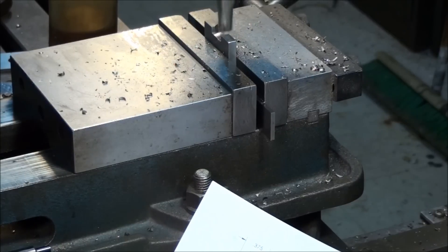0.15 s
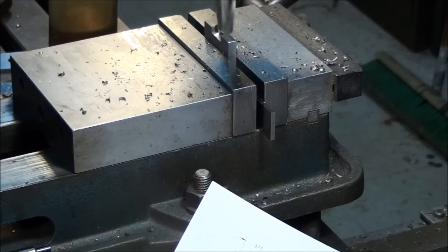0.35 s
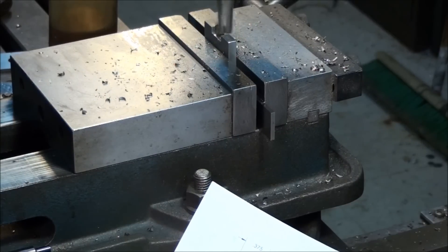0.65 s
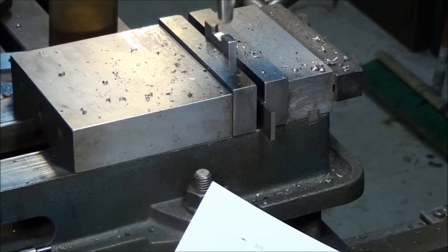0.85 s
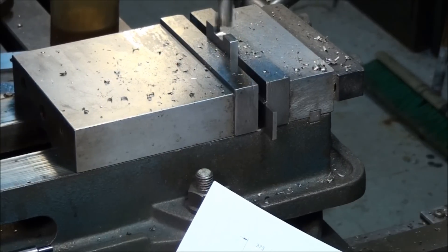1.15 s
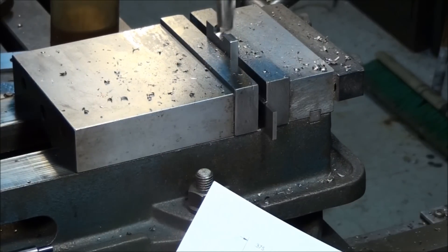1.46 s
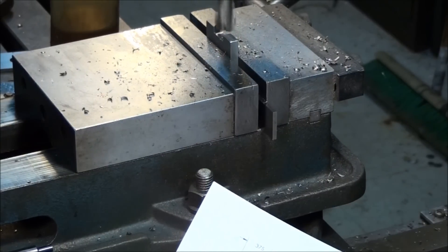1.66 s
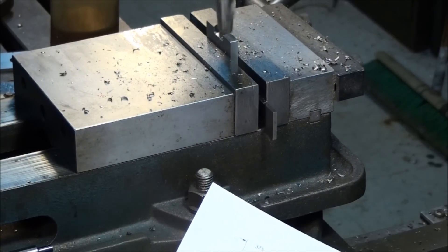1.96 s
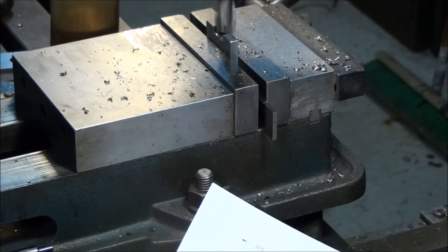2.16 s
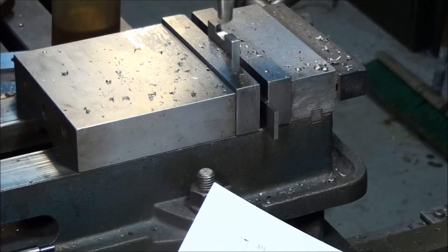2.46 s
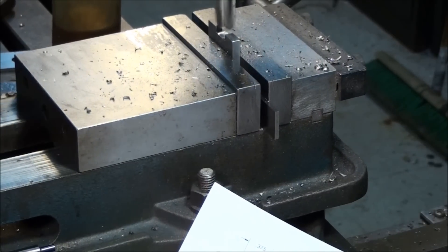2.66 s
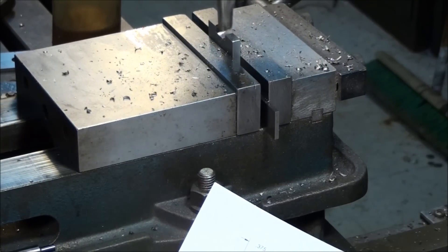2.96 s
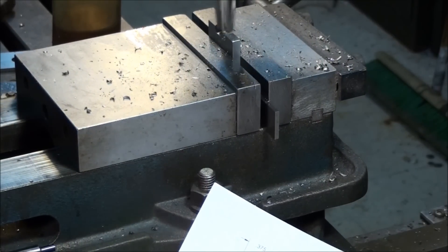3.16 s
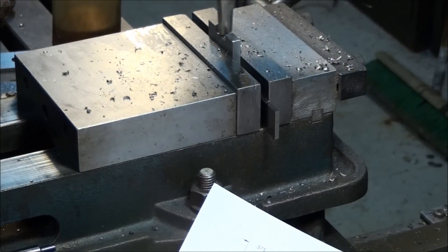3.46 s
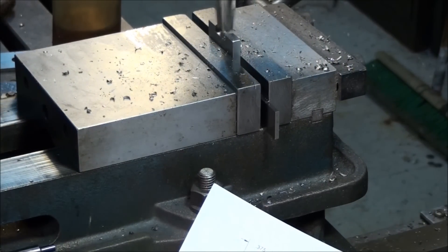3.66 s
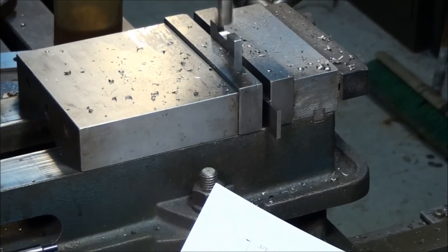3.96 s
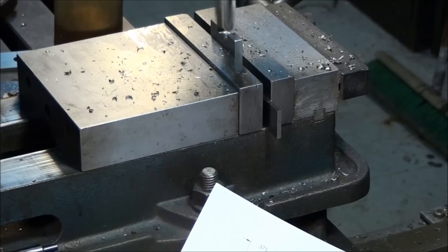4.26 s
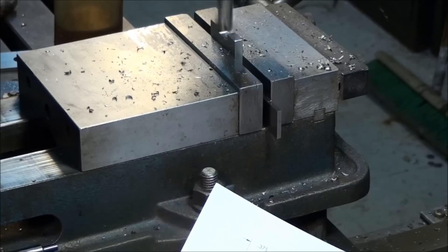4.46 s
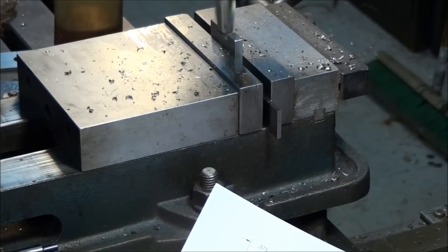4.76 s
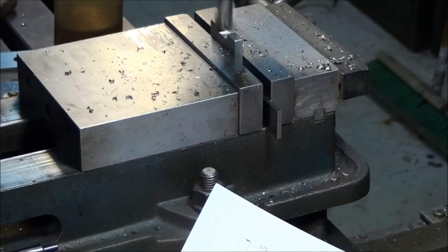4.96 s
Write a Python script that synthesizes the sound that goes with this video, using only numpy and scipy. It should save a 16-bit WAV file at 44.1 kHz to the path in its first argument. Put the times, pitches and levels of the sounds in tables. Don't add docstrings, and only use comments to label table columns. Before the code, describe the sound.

A spindle motor hums and whines continuously with a rough bearing rush. Over it come four bursts of fast, regular metallic chatter, each bite a sharp bright crunch with ringing metal and a dull low knock from the vise and table. Bites vary unevenly, and one faint scrape comes between the second and third bursts. Close microphone, narrow stereo, short hard-room reverberation.

```python
import sys
import numpy as np
from scipy import signal
from scipy.fft import rfft, irfft, next_fast_len
from scipy.io import wavfile
from scipy.ndimage import uniform_filter1d, map_coordinates

SR = 44100
rng = np.random.default_rng(int(sys.argv[2]) if len(sys.argv) > 2 else 0)


def wav_record(signal):
    frames = np.transpose(np.atleast_2d(signal))
    bounded = np.clip(frames, -1, 1)
    quanta = np.round(bounded * 32767).astype(np.int16)
    wavfile.write(sys.argv[1], SR, quanta)


def boost(x):
    u = np.asarray(x, float) / 20
    return 10 ** u


N = 224670
TURN_S = .03558

# first bite t/s, last bite t/s
PASSES = [
    (0.0148, 0.8),
    (1.2934, 2.265),
    (2.542, 2.64),
    (2.7505, 3.711),
    (4.1045, 4.945),
]
# t/s, level/dB
DEPTH_OF_CUT = [
    [(0, -1), (.2, 1.5), (.35, -0.5), (.52, -4), (.62, -5.5), (.76, -8.5), (.8, -14.5)],
    [(1.29, -1), (1.4, 0.9), (1.7, 0.8), (2.12, 0.15), (2.18, -6), (2.255, -7.5), (2.29, -10.5)],
    [(2.54, -23), (2.61, -15.5), (2.65, -19)],
    [(2.75, -2), (2.9, 0.2), (3.2, 0.15), (3.45, -0.5), (3.5, -5.5), (3.68, -8.5), (3.71, -15.5)],
    [(4.1, 0.5), (4.25, -2), (4.45, -1.2), (4.65, 2), (4.75, -4), (4.9, -4), (4.965, -7.5), (4.995, -11),
     (5.03, -21)],
]
# t/s, catch level/dB, shank level/dB
SKIMS = [(.121, -8.5, -1), (.193, -14.5, -2), (.263, -15, 1), (.405, -14, -3), (.549, -11, 7),
         (.692, -4, 1), (1.4, -4, -6), (1.436, -5, 4), (1.507, -10.5, 10), (1.613, -6.5, -5),
         (1.756, -4.5, -9), (1.898, -11, 1), (2.04, -1.5, -3), (2.076, -3.5, 4), (2.82, -13, 5),
         (2.893, -3.5, 1), (2.929, -5.5, 10), (3.107, -3, 2), (3.249, -13, 1), (3.284, -7.5, 10),
         (3.356, -4.5, 2), (3.463, -5, -2), (4.104, -10, -1), (4.14, -8, 3), (4.246, -7.5, 0),
         (4.282, -13, 15), (4.46, -2.5, 1), (4.782, -1, 5), (4.817, -8, 5), (4.924, -14, 12)]
# t/s, catch level/dB, shank level/dB, wall level/dB
HARD_BITES = [(.086, 1, 5, 3), (.228, 0, 4.5, 1), (.335, 3.5, -13, 3), (.37, 1.5, 6, 1),
              (.478, -2.5, 3, 5.5), (.514, 5, -4, 3), (.585, 4.5, -1, -8), (.622, 7.5, -2, 1.5),
              (.656, 1, 5, 4), (1.364, 2.5, 3, -1), (1.543, -0.5, -1, 4), (1.649, -2.5, 8, 2),
              (1.72, 0, 6, -1.5), (1.791, 1.5, 5, 3), (1.827, 1, -9, 3), (1.97, 2.5, -8, 1),
              (2.004, 1.5, -1, -5), (2.148, -1, 7, 7), (2.858, 3.5, 5, 2.5), (3.0, 4, 4, -1),
              (3.071, 2, 3, -2), (3.178, 4, -5, 3.5), (3.214, 2, 5.5, -6), (3.32, 4.5, -5, -3),
              (3.57, 2, 8, 0), (4.354, 1.5, 5, 0), (4.567, -3, 7, 6.5), (4.674, -1.5, -4, 3.5),
              (4.747, 10, -11, -9), (4.852, 0.5, 5, 2.5)]

# f/Hz, width/Hz, level/dB
CUTTER_MODES = [(8666, 120, 0.5), (8762, 104, 2), (7980, 130, -14)]
SHANK_MODES = [(12300, 190, 7), (12450, 400, 2), (13300, 200, -15), (15300, 260, -20), (10980, 110, -16)]
WALL_MODES = [(4040, 50, -5), (4150, 80, -6), (4500, 70, 4), (4420, 110, -3), (5650, 88, -17),
              (2533, 160, -8.5), (3068, 94, -10.5)]
WALL_ROOT_MODES = [(3405, 120, -8), (3618, 96, 0.5), (4050, 97, 3), (4164, 47, -1.5)]
TABLE_MODES = [(525.6, 40, -2.5), (1327, 254, -1.5), (2116, 99, -10), (2308, 34, -12), (2525, 22, -16)]
BED_MODES = [(210, 21, -3.5), (296, 52, -3), (364, 20, 3), (419, 12.6, 8), (536, 22, 2.5), (647, 34, 7.5),
             (762, 18, 4.5)]

# f/Hz, density level/dB
SHEAR_SPECTRUM = [(880, -1), (1500, -43), (1710, -8.5), (3310, -4), (4330, 2.5), (5940, -9), (6430, -3.5),
                  (8240, -5), (8920, -17), (9280, -8), (10200, -17), (12600, -16), (16000, -52)]
CLATTER_SPECTRUM = [(35, -48), (60, -38), (150, 3), (195, -12), (414, -6.5), (837, -4), (1320, 1),
                    (1690, -7), (3000, -11.5), (3900, -19), (6600, -120)]
BEARING_SPECTRUM = [(15, -59), (50, -30), (90, -49), (125, -6.5), (190, -8), (300, -10), (450, -4.5),
                    (700, -7), (1100, -7.5), (1420, -5), (1700, -18), (4400, -21.5), (4900, -26),
                    (8500, -29.5), (16000, -48.5)]

SING_HZ = (5036, 6545)
# t/s, level/dB
LOW_SWELLS = [(.052, -37), (.23, -37), (.302, -38), (.444, -34.5), (.55, -39), (.66, -39.5), (.765, -37.5),
              (1.33, -40), (1.544, -38), (1.83, -37), (2.08, -42), (2.15, -34.5), (2.255, -45), (3.18, -41),
              (3.322, -37.5), (3.464, -32), (4.178, -38), (4.355, -36.5), (4.57, -36), (4.746, -33),
              (4.89, -35)]
HIGH_SWELLS = [(.03, -37.5), (.25, -41), (.63, -36), (1.35, -40), (1.59, -36), (1.84, -33), (2.08, -34),
               (2.27, -36), (3.18, -34), (3.43, -38), (4.22, -34), (4.49, -36), (4.69, -40), (4.85, -39)]

SHAKE_HZ = (55.6, 82.6, 140.8, 168.9)
SHAKE_DB = [(7.7, 11, 8.6, -19), (17, 16, 4.2, -0.5), (1, -1, 7, -12), (17.46, 13, 12.3, 6),
            (9.9, 12, 11.8, 4)]

# f/Hz, rms level/dB, wander/Hz
MOTOR_TONES = [(49, -46.5, .5), (118.8, -34, 0.63), (178, -42, 1.7), (435.7, -40, 4.27), (485, -41, 1.74),
               (685, -39, 2.84), (905, -45, 3.13), (969, -39.5, 6.27), (1134, -41.5, 6.66),
               (1294, -39, 0.93), (1295, -43.5, 1.06), (1400, -28.5, 0.89), (1411, -36.5, 2),
               (1468, -39.5, 2.7), (1540, -45, 1.8), (1640, -48, 1.2)]
# t/s, level/dB
BEARING_DB = [(0, -19.5), (.9, -27.5), (1.2, -24.5), (2.35, -26), (2.6, -23.5), (2.75, -25.5), (3.8, -25),
              (4.05, -27.5), (5.09, -24)]

# f/Hz, t60/s
SHOP_T60 = [(150, 0.57), (1500, 0.49), (6000, 0.22), (14000, 0.09)]
# f/Hz, left minus right level/dB
LEAN = [(60, 0), (250, 0.3), (500, -0.7), (1000, -2), (2400, -1.8), (6000, -2.3), (14000, -4)]
# f/Hz, side minus middle level/dB
WIDTH = [(35, -17), (80, -27), (150, -31), (300, -23), (600, -19), (1200, -15), (2500, -10.5), (5000, -16),
         (8700, -11), (14000, -15)]
# f/Hz, level/dB
MICROPHONE = [(10, -40), (30, -17), (50, -9), (100, -1), (15200, -0.5), (15700, 1), (16000, -30),
              (16400, -52)]


def cutting():
    cutter_db, shank_db, wall_db, table_db = bite_levels()
    cutter = bites(cutter_db + 0.5, modes(CUTTER_MODES, 3.8, 0.0013), lead_s=0.00023,
                   rise_s=0.00013, fall_s=0.0059, drag_db=-51, spiky_db=4.5)
    shank = bites(shank_db + 0.2, modes(SHANK_MODES, 1.7, 0.00098), lead_s=0.0003,
                  rise_s=0.00021, fall_s=0.0018, drag_db=-77, spiky_db=7.5)
    light_db = np.clip(wall_db - cutter_db, 0, 15)
    root = bites(wall_db - 10.5 + 0.65 * light_db, modes(WALL_ROOT_MODES, 4.5, 0.01), lead_s=0.003,
                 rise_s=0.0007, fall_s=0.0035, drag_db=-26, spiky_db=4)
    wall = bites(wall_db - 3.0 - 0.5 * light_db, modes(WALL_MODES, 4.9, 0.0018), lead_s=0.001185,
                 rise_s=0.0041, fall_s=0.0078, drag_db=-42, spiky_db=1.8)
    hiss = bites(0.52 * cutter_db + 0.34 * wall_db - 2.0, colour(SHEAR_SPECTRUM), lead_s=0.0006,
                 rise_s=0.00094, fall_s=0.0095, drag_db=-18.5, spiky_db=2.1)
    table = bites(table_db - 4.5, modes(TABLE_MODES, 4.6, 0.016), lead_s=0.001165,
                  rise_s=0.0042, fall_s=0.016, drag_db=-29, spiky_db=2.3)
    clatter = bites(table_db - 3.5, colour(CLATTER_SPECTRUM), lead_s=0.00049,
                    rise_s=0.0046, fall_s=0.018, drag_db=-2.9, spiky_db=3.2)
    bed = bites(table_db - 9.5, modes(BED_MODES), lead_s=0,
                rise_s=0.00011, fall_s=0.0003, drag_db=-80, spiky_db=0, noisy=False)
    return cutter + shank + root + wall + hiss + table + clatter + bed


def bite_times():
    return np.concatenate([a + TURN_S * np.arange(round((b - a) / TURN_S) + 1) for a, b in PASSES])


def depth_db(s):
    return np.interp(s, *np.concatenate(DEPTH_OF_CUT).T)


def bite_levels():
    s = bite_times()
    luck = rng.standard_normal((len(s), 4))
    odd = luck[:, :3] * [1.5, 2, 1.5]
    for when, *db in SKIMS + HARD_BITES:
        odd[np.abs(s - when).argmin(), :len(db)] = db
    catch_db, shank_db, wall_db = odd.T
    skim_db = np.minimum(catch_db, 0)
    growth_db = 1.58 * depth_db(s) + catch_db
    cutter = -23.5 + growth_db
    shank = -30.5 + 1.25 * growth_db + shank_db
    wall_full_db = -6
    wall = -23 + 1.38 * np.minimum(depth_db(s) - wall_full_db, 0) + 0.27 * skim_db + wall_db
    table = -16.5 + depth_db(s) + 0.3 * skim_db + 1.1 * luck[:, 3]
    return cutter, shank, wall, table


def bites(db, response, lead_s, rise_s, fall_s, drag_db, spiky_db, noisy=True):
    window = round(.03 * SR)
    t = np.arange(3 * window) / SR
    shape = (1 - np.exp(-t / rise_s)) * (np.exp(-t / fall_s) + boost(drag_db) * (t < .036))
    chips = rng.standard_normal((len(db), 2, len(t)))
    force = boost(spiky_db * unit(uniform_filter1d(chips[:, 1], 60, axis=1)))
    if noisy:
        force = chips[:, 0] * force
    rows = filtered(shape * force, response)
    rms = np.sqrt(np.mean(rows[:, :window] ** 2, axis=1, keepdims=True))
    rows *= boost(db)[:, None] / rms
    start = np.round((bite_times() - lead_s) * SR).astype(int).clip(0)
    index = start[:, None] + np.arange(len(t))
    return np.bincount(index.ravel(), rows.ravel(), N + SR)[:N]


def modes(table, scatter_db=0, drift=0):
    luck = rng.standard_normal((len(bite_times()), 2, len(table), 1))
    hz, width_hz, db = np.transpose(table)[..., None]
    gain = boost(db + scatter_db * luck[:, 0])
    hz = hz * (1 + drift * luck[:, 1])

    def response(f):
        total = 0
        for k in range(len(table)):
            damping = 1j * f * width_hz[k]
            total = total + (-1) ** k * gain[:, k] * damping / (hz[:, k] ** 2 - f * f + damping)
        return total
    return response


def singing():
    t, s = np.arange(N) / SR, bite_times()
    last = np.clip(np.searchsorted(s, t) - 1, 0, None)
    since_s = t - s[last]
    steady_db = -44.5 + 0.83 * np.minimum(depth_db(s) + 9, 0)[last]
    dying_db = 260 * np.clip(since_s - TURN_S, 0, None) - 0.68 * np.minimum(depth_db(s) + 8, 0)[last]

    def mode(hz, rows, fall_db_s, knock_rad, kick_db, sag_db_s):
        kick = rng.standard_normal((len(s), 2))
        db = swells(rows, steady_db, fall_db_s) - dying_db
        db = db + 11.5 + kick_db * kick[last, 1] + 1.2 * wobble(56) - sag_db_s * np.clip(since_s, 0, .04)
        phase = np.cumsum(knock_rad * kick[:, 0])[last] + 1.3 * wobble(40)
        return boost(db) * np.sin(2 * np.pi * hz * t + phase)

    low = mode(SING_HZ[0], LOW_SWELLS, fall_db_s=45, knock_rad=.6, kick_db=1.8, sag_db_s=70)
    high = mode(SING_HZ[1], HIGH_SWELLS, fall_db_s=190, knock_rad=1.6, kick_db=3.1, sag_db_s=300)
    return low + high


def swells(rows, steady_db, fall_db_s):
    rise_db_s = 1200
    s, db = np.transpose(rows)[..., None]
    coarse = np.arange(0, N, 64)
    since_s = coarse / SR - s
    peak_db = np.max(db - np.where(since_s > 0, fall_db_s, -rise_db_s) * since_s, axis=0)
    return np.maximum(steady_db, np.interp(np.arange(N), coarse, peak_db))


def shaking():
    idle_db, trend_db, rise_s = (-58.5, -58.5, -44.5, -40), (12, -6, -5, -6), 0.051
    t = np.arange(N) / SR
    level = np.transpose([idle_db]) + 0 * t
    for (a, b), db in zip(PASSES, SHAKE_DB):
        held = np.clip(np.minimum(t - a + rise_s, b + rise_s - t) / (2 * rise_s), 0, 1)
        progress = (t - a) / (b - a) - .5
        level = level + held * (np.transpose([db]) + np.outer(trend_db, progress))
    return sum(boost(db + 4.0 + 0.4 * wobble(9)) * np.sin(2 * np.pi * hz * t) for hz, db in zip(SHAKE_HZ, level))


def motor_tones():
    t = np.arange(N) / SR
    out = np.zeros(N)
    for hz, db, wander_hz in MOTOR_TONES:
        level = np.sqrt(2) * boost(db + 0.68 * wobble(14))
        cycles = hz * t + np.cumsum(wander_hz * wobble(25)) / SR
        out += level * np.sin(2 * np.pi * cycles)
    return out


def motor_bearings():
    t = np.arange(N) / SR
    noise = unit(filtered(rng.standard_normal(N), colour(BEARING_SPECTRUM)))
    flutter_db = 0.9 * wobble(6.2) + 1.7 * np.sin(2 * np.pi * 59.8 * t)
    return boost(np.interp(t, *np.transpose(BEARING_DB)) + flutter_db) * noise


def shop(x):
    hz, t, z = signal.stft(rng.standard_normal((2, SR // 2)), SR, nperseg=256)
    decay = boost(-60 * t / along(SHOP_T60, hz)[:, None])
    tail = signal.istft(z * decay, SR, nperseg=256)[1]
    tail = tail / np.linalg.norm(tail, axis=1, keepdims=True)
    delayed = np.pad(x, (200, 0))[None]
    return signal.fftconvolve(delayed, tail, axes=1)[:, :N]


def unit(x):
    return x / np.sqrt(np.mean(x ** 2) + 1e-20)


def along(points, hz):
    f, v = np.transpose(points)
    return np.interp(np.log(hz + 1), np.log(f + 1), v)


def colour(spectrum):
    return lambda f: boost(along(spectrum, f))


def filtered(x, response):
    n = x.shape[-1]
    m = next_fast_len(n + 2048)
    return irfft(rfft(x, m) * response(np.fft.rfftfreq(m, 1 / SR)), m)[..., :n]


def wobble(rate_hz):
    coarse = np.arange(0, N + 64, 64)
    knots = rng.standard_normal(int(N * rate_hz / SR) + 4)
    return np.interp(np.arange(N), coarse, map_coordinates(knots, [coarse * rate_hz / SR]))


def scene():
    tones = motor_tones() + motor_bearings() * 0 + singing() + shaking()
    dry = cutting() + motor_bearings()
    shared, apart = shop(dry)
    mid = dry + boost(-12.5) * shared + tones
    tone_side = filtered(tones, lambda hz: 1j * boost(along(WIDTH, hz) + 1.0))
    side = filtered(apart, colour(WIDTH)) + tone_side
    return filtered(np.array([mid + side, mid - side]), lambda hz: boost(np.outer([.5, -.5], along(LEAN, hz))))


def top_cut(x):
    return signal.sosfilt(signal.butter(12, 16480, fs=SR, output="sos"), x)


def record(dry):
    top = 1.1
    rounded = dry / (1 + np.abs(dry / top) ** 6) ** (1 / 6)
    return top_cut(filtered(rounded, colour(MICROPHONE)))


dry = scene()
out = record(dry)
wav_record(out)
```